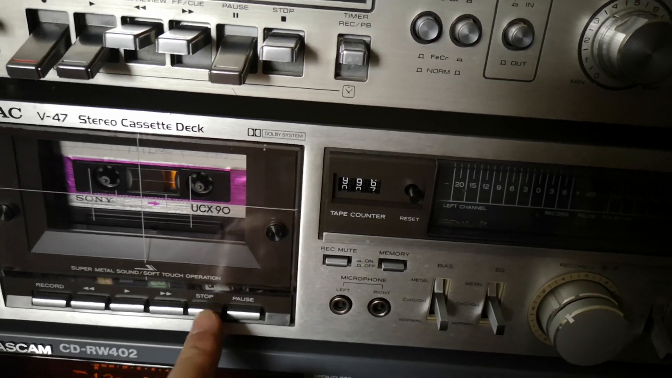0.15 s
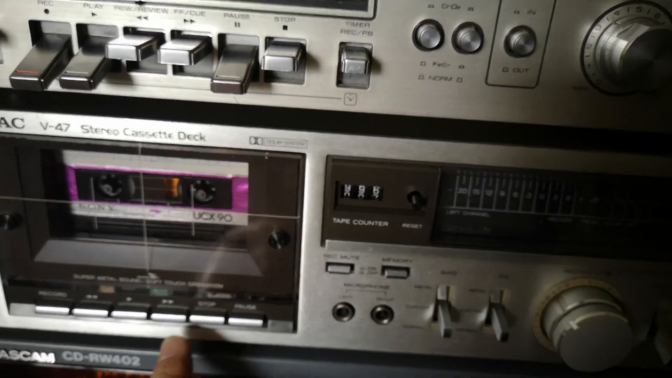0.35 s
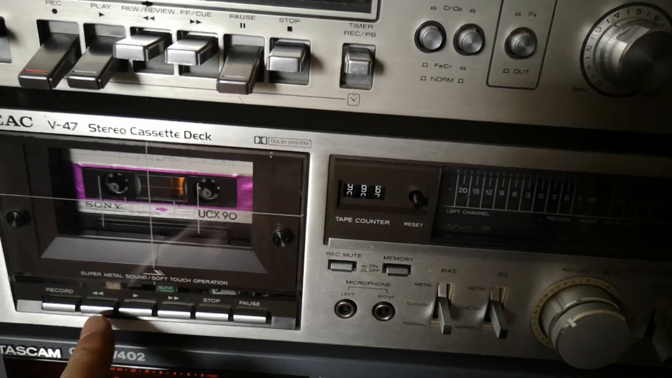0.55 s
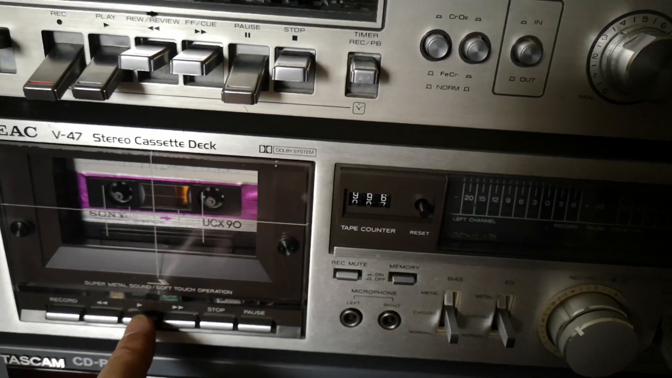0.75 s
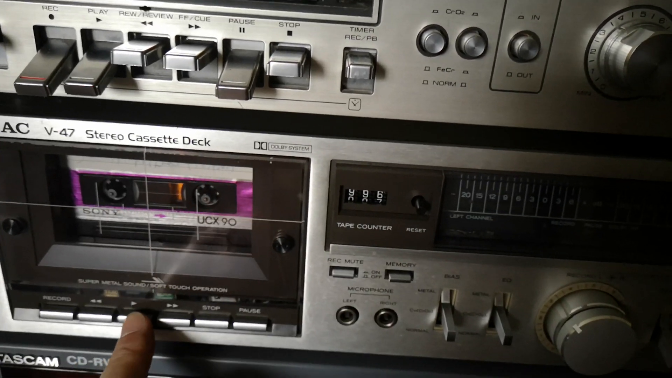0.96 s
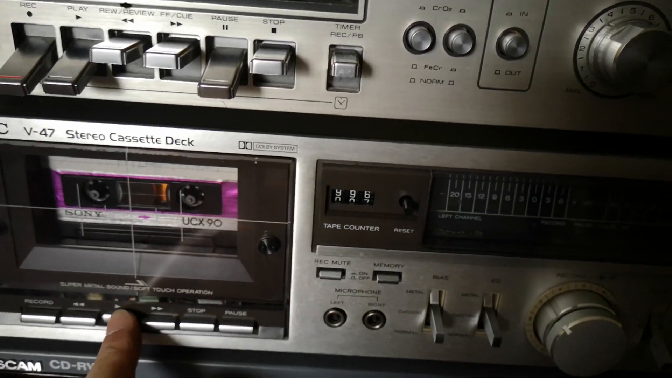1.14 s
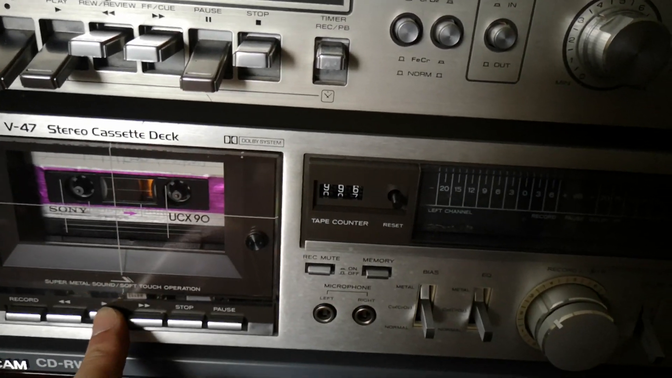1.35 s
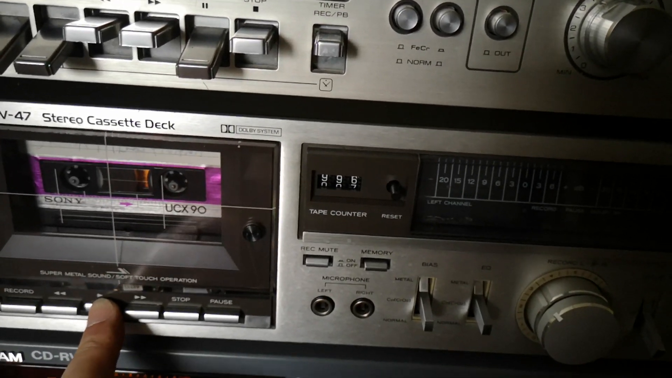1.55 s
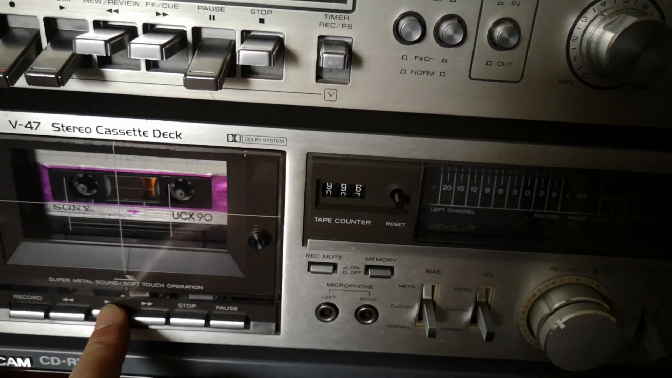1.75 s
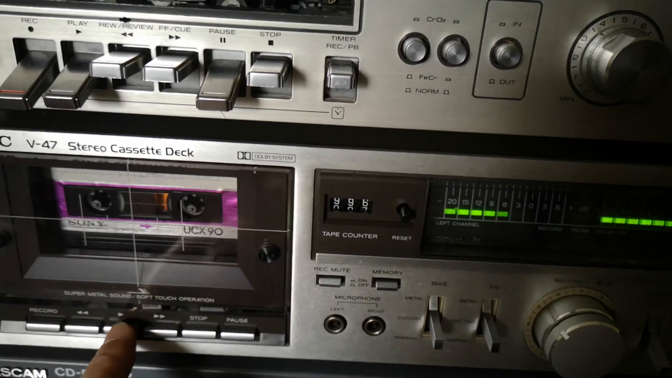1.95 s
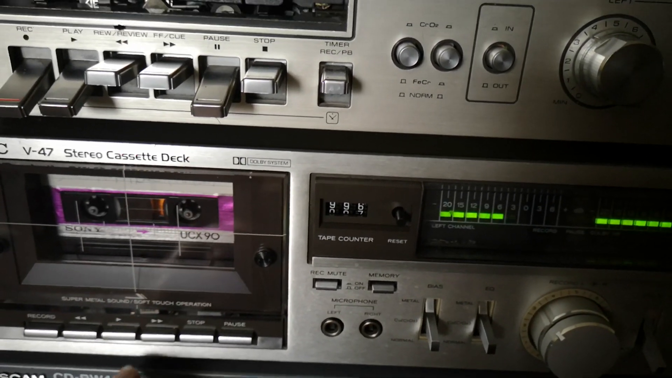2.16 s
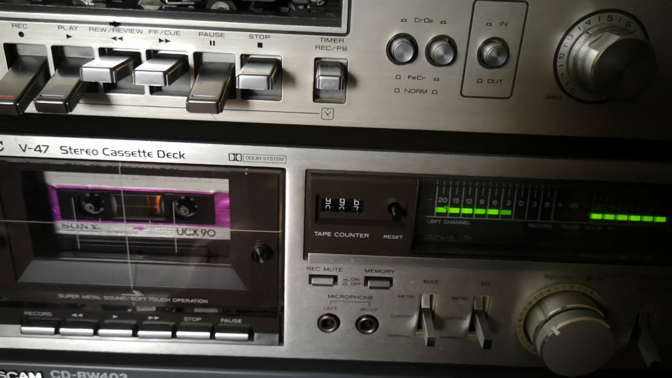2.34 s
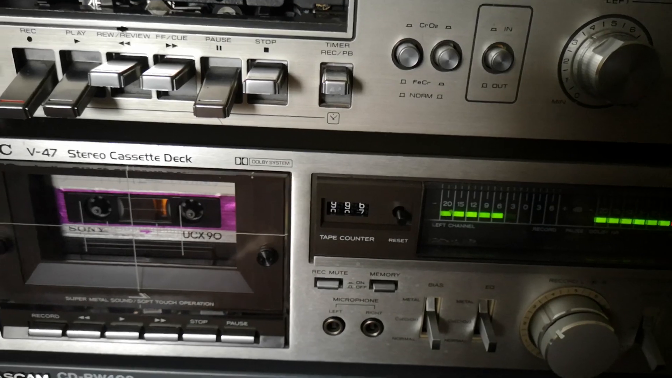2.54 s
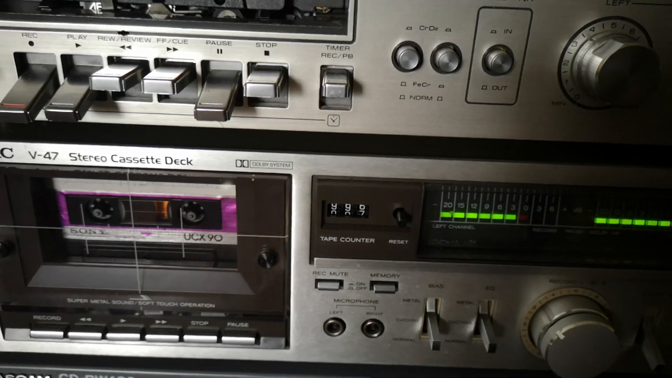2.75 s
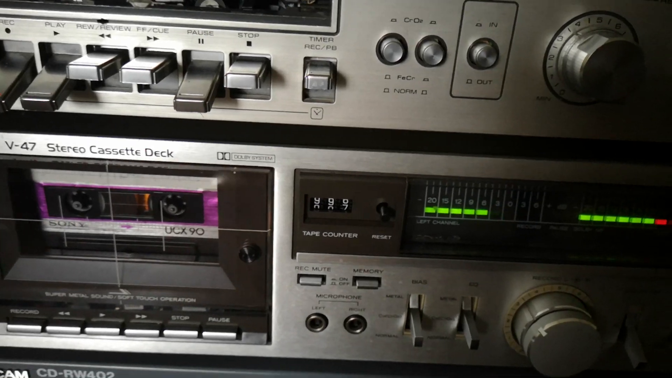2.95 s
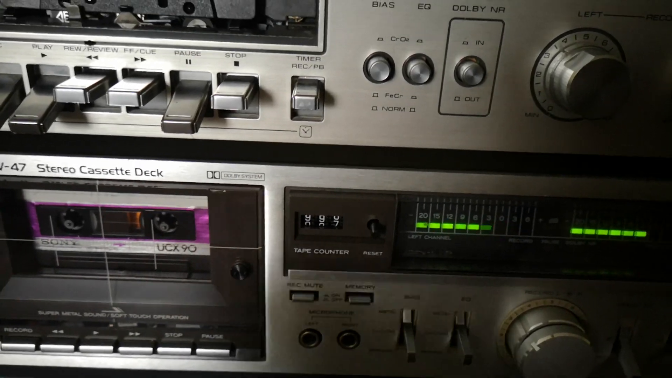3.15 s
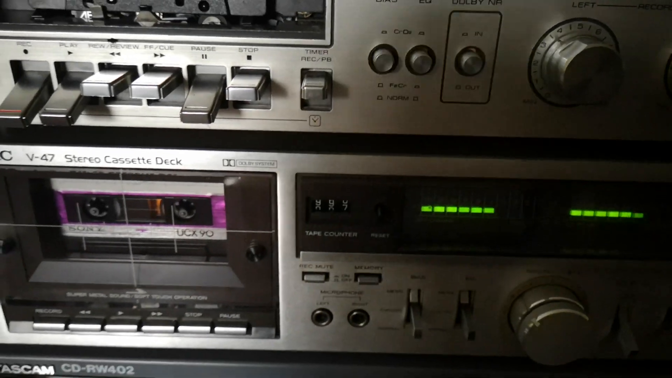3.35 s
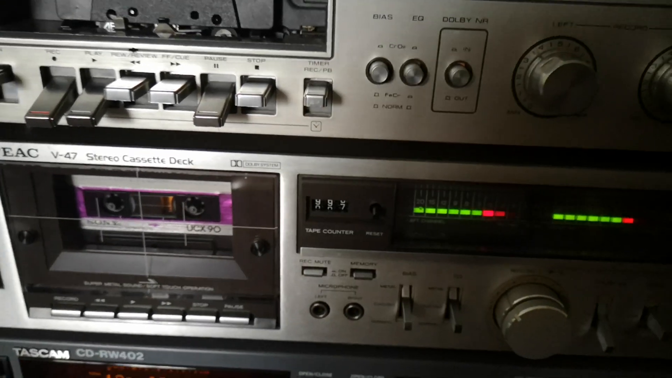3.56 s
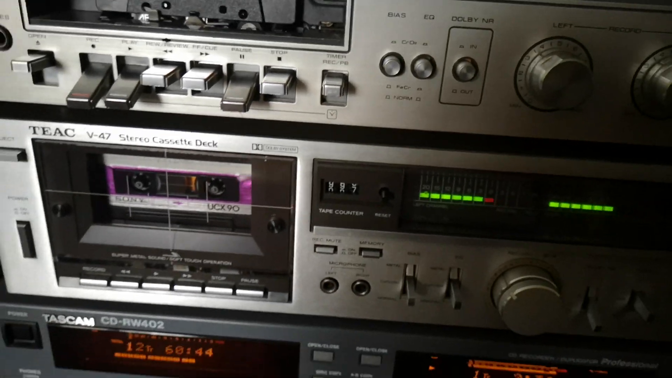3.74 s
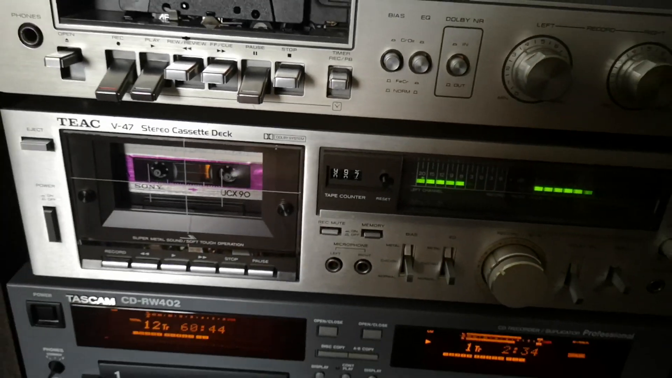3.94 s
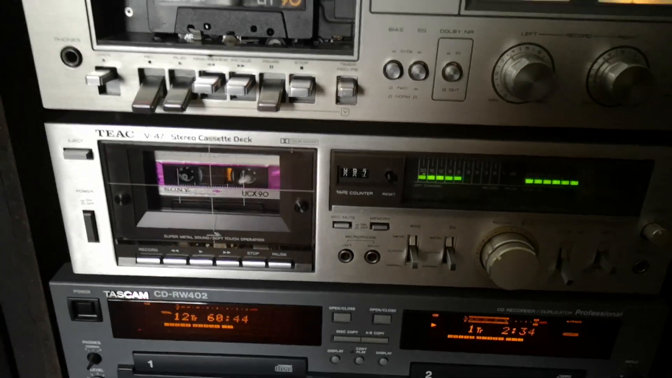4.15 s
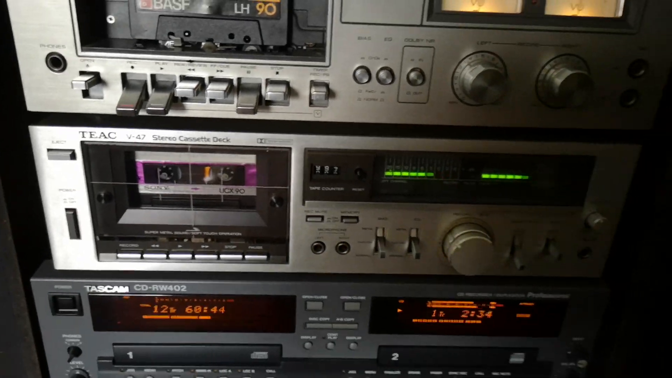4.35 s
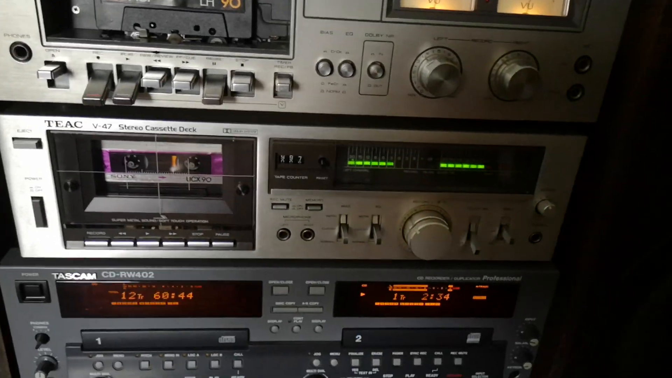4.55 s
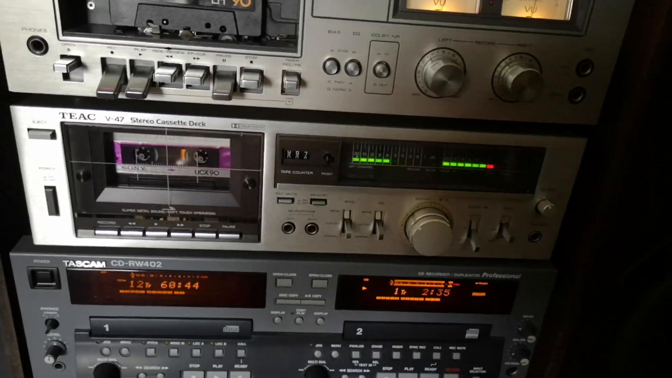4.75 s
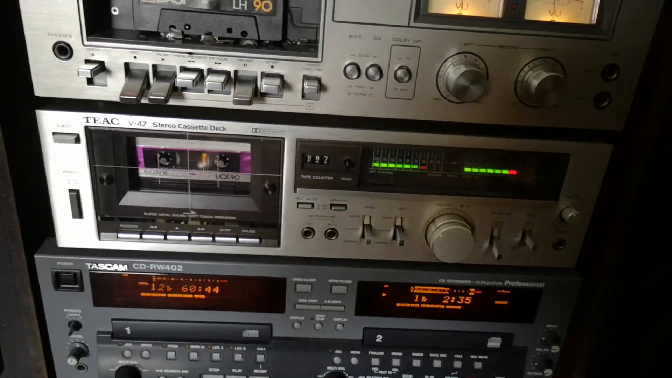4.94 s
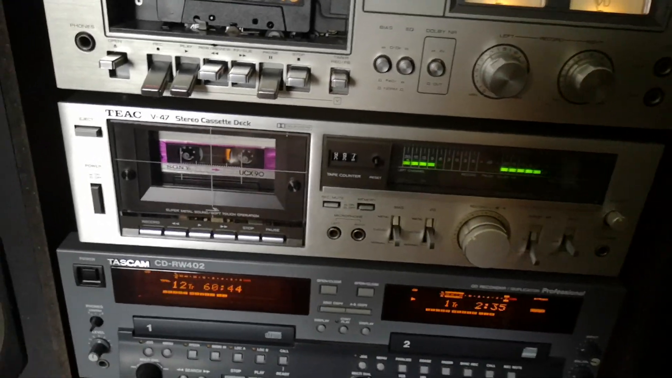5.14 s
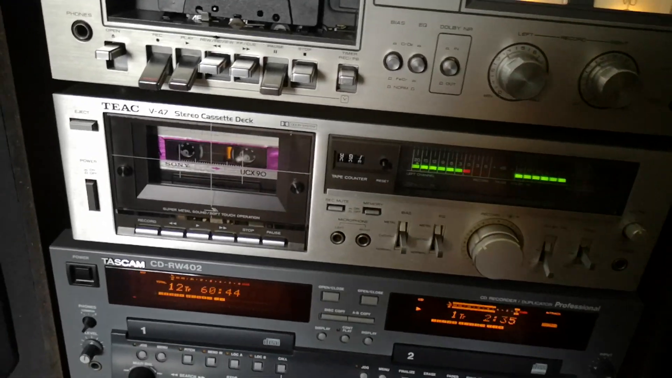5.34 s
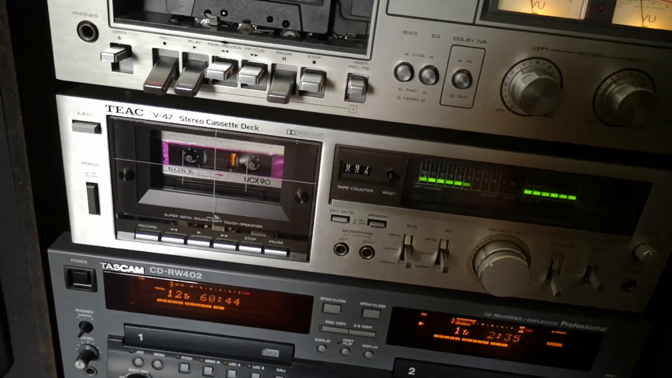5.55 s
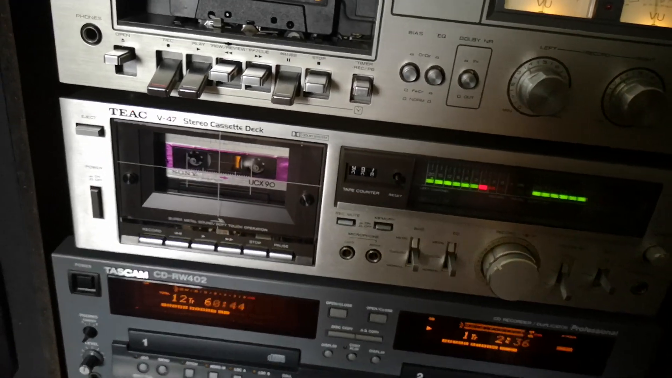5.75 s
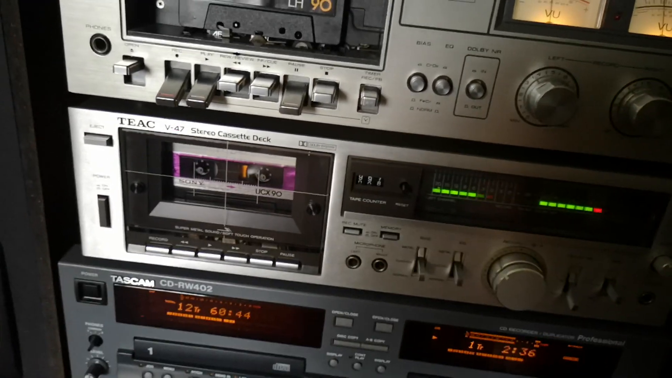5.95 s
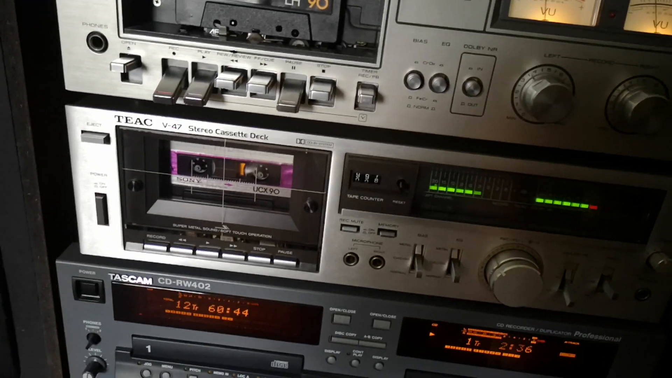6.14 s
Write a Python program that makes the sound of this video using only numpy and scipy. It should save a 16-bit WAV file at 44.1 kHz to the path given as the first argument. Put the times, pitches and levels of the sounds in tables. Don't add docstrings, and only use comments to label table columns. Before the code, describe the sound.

Stereo hand-held microphone close to a tape deck. Chattering latches and levers snap in separate bursts during the first two seconds, loudest at the start and end, with short room echoes and low hollow thuds. Afterwards the deck falls silent except for low hum and thin hiss, broken by dry clicks, tiny crackles and rubbing of the camera body, mostly on the left.

```python
import sys
import numpy as np
from scipy import signal
from scipy.fft import rfft, irfft
from scipy.io import wavfile
from scipy.ndimage import uniform_filter1d

SR = 44100
rng = np.random.default_rng(int(sys.argv[2]) if len(sys.argv) > 2 else 0)


def digitize_waveform(pressure):
    field = np.atleast_2d(pressure).T
    bounded = np.clip(field, -1, 1)
    quanta = np.round(bounded * 32767).astype(np.int16)
    wavfile.write(sys.argv[1], SR, quanta)


def elevation(decibels):
    levels = np.asarray(decibels, float)
    return 10 ** (levels / 20)


N = 273243
T = np.arange(N) / SR
WIDEST_PAN_DB = 24


def evened(x):
    return x / np.sqrt(np.mean(x ** 2) + 1e-20)


def read(points, hz):
    f, value = np.transpose(points)
    return np.interp(np.log(hz + 1), np.log(f + 1), value)


def sides(pan_db):
    return elevation(np.array([[.5], [-.5]]) * pan_db)


def add(mix, s, sound, pan_db):
    part = mix[:, round(s * SR):][:, :sound.shape[-1]]
    part += sides(pan_db) * sound[..., :part.shape[1]]


def band(x, lo_hz, hi_hz):
    return signal.sosfilt(signal.butter(2, [lo_hz, hi_hz], "bandpass", fs=SR, output="sos"), x)


def arch(s, length):
    return np.sin(np.pi * np.clip((T - s) / length, 0, 1))


# pitch_hz, level_db_per_hz
HISS_SPECTRUM = [(20, -30.5), (65, -13.5), (100, -19), (150, -16), (241, -19.5), (319, -25.5), (560, -29.5),
                 (949, -27.5), (1960, -25.5), (2900, -31.5), (4670, -38.5), (6000, -39), (7500, -43),
                 (14300, -46), (16000, -47)]
# pitch_hz, likeness (-1 to 1)
HISS_LIKENESS = [(60, .9), (200, .8), (330, .5), (560, -.5), (800, -.33), (1350, .46), (2600, -.2),
                 (4000, 0)]
# pitch_hz, left_right_db
HISS_LEAN = [(60, 5.5), (180, 0.5), (550, 1.5), (1650, 1.5), (4970, 2), (15000, -2)]
HISS_DB, RIPPLE_DB, PATCH_DB = -72, 1.2, 0.89


def hiss():
    frames, hz = N // 512 + 5, np.fft.rfftfreq(2048, 1 / SR)
    a, b, c, d, patches = rng.standard_normal((frames, 1025, 5)).T
    patches = evened(uniform_filter1d(uniform_filter1d(patches, size=20, axis=0), size=8, axis=1))
    ripple = evened(uniform_filter1d(rng.standard_normal(1025), size=4)) * (hz > 700)
    level_db = (read(HISS_SPECTRUM, hz) + RIPPLE_DB * ripple)[:, None] + PATCH_DB * patches
    likeness = read(HISS_LIKENESS, hz)[:, None]
    lean = elevation(read(HISS_LEAN, hz) / 2)[:, None]
    left = a + 1j * b
    right = likeness * left + np.sqrt(1 - likeness ** 2) * (c + 1j * d)
    z = np.array([left * lean, right / lean]) * elevation(level_db)
    x = signal.istft(z, nperseg=2048, noverlap=1536)[1][:, :N]
    return elevation(HISS_DB) * x / np.std(band(x.mean(0), 170, 22000))


# time_s, level_db
HUM_FADE = [
    (0, -64),
    (4.2, -65.5),
    (6.2, -67),
]
# multiple of the hum pitch, level_db
OVERTONES = [(.5, -14), (1.5, -18.5), (2, -15), (2.5, -34.5)]
# pitch_hz, level_db
MOTOR_WHINE = [(781, -94.5), (937, -88.5), (1289, -89.5), (1464, -95), (1739, -90.5), (2040, -90.5),
               (2374, -100), (2632, -92.5)]
HUM_HZ = 119.97
BEAT_RAD_PER_S, BEAT_TOP_S, BEAT_DB = 1.44, .1, -11.5


def hum():
    turn = 2 * np.pi * HUM_HZ * T
    buzz = np.sin(turn) + elevation(BEAT_DB) * np.sin(turn - BEAT_RAD_PER_S * (T - BEAT_TOP_S))
    for multiple, db in OVERTONES:
        buzz += elevation(db) * np.sin(2 * np.pi * (multiple * HUM_HZ * T + rng.random()))
    whine = sum(elevation(db) * np.sin(2 * np.pi * (hz * T + rng.random())) for hz, db in MOTOR_WHINE)
    fade = elevation(np.interp(T, *np.transpose(HUM_FADE)))
    return np.sqrt(2) * (fade * buzz + whine)


# pitch_hz, t60_s
ROOM_DECAY = [(200, 1), (700, 0.27), (1200, 0.2), (1900, 0.33), (3000, 0.24), (6000, 0.28), (10000, 0.23),
              (14000, 0.37)]
# pitch_hz, level_db
ROOM_TONE = [(700, -1.5), (1200, 2.5), (1900, -1), (3000, 0), (6000, -2), (10000, -2), (14000, -7.5)]
ROOM_HOLD_S, ROOM_CUT_DB_PER_S = 0.098, 200
ROOM_SWAP_S = .03


def room(x):
    taps = np.zeros((3, 2, SR // 2))
    starts = np.arange(130, SR // 2 - 20, 20)
    at = starts + rng.integers(0, 20, (3, 2, len(starts)))
    np.put_along_axis(taps, at, rng.choice([-1., 1.], at.shape), 2)
    hz, t, z = signal.stft(taps, SR, nperseg=256)
    fall_db = -60 * t / read(ROOM_DECAY, hz)[:, None] - ROOM_CUT_DB_PER_S * np.maximum(t - ROOM_HOLD_S, 0)
    gain = elevation(fall_db + read(ROOM_TONE, hz)[:, None])
    tails = signal.istft(z / (abs(z) + 1e-9) * gain, SR, nperseg=256)[1]
    thirds = np.arange(3)[:, None, None] / 3
    turns = np.sqrt(2 / 3) * np.cos(np.pi * (T / ROOM_SWAP_S + thirds))
    return signal.oaconvolve(turns * x, tails / np.linalg.norm(tails[0, 0]), axes=2)[..., :N].sum(0)


# start_s, length_s, peak_db, pitch_hz
JOLTS = [(0.153, 0.11, -63.5, 30), (0.347, 0.21, -60, 30.08), (1.574, 0.32, -56, 48.4),
         (2.094, 0.25, -57, 30.2), (2.306, 0.19, -60.5, 29.86), (3.426, 0.19, -54.5, 26.45),
         (3.635, 0.16, -57, 30.3), (3.759, 0.15, -57, 29.9), (3.854, 0.14, -54.5, 29.5),
         (4.064, 0.15, -62, 30.4), (4.22, 0.13, -58, 29.9), (4.581, 0.064, -57, 50.3),
         (5.489, 0.18, -57.5, 30.1)]
RUMBLE_DB = -73


def hand_jolts():
    lumps = elevation(RUMBLE_DB) * evened(band(band(rng.standard_normal(N), 8.5, 45), 9.2, 40))
    for s, length, db, hz in JOLTS:
        lumps += elevation(db) * arch(s, length) ** 2 * np.sin(2 * np.pi * hz * (T - s))
    return lumps


# start_s, length_s, level_db, pitch_hz
RUSTLES = [
    (0, 0.14, -60.5, 1900),
    (1.297, 0.3, -66, 1780),
    (3.6, 0.974, -71, 1895),
    (6.018, 0.5, -68, 2480),
]


def sliding():
    grain_db = 2.9 * rng.standard_normal(N // 200 + 1).repeat(200)[:N]
    grit = rng.standard_normal((2, N)) * elevation(grain_db)
    out = np.zeros((2, N))
    for s, length, db, hz in RUSTLES:
        swell = np.minimum(3 * arch(s, length), 1)
        out += elevation(db - 6) * swell * evened(band(grit, 0.44 * hz, 1.3 * hz))
    return out


# start_s, length_s, level_db, pitch_hz, bright_part_db
RUBS = [
    (.005, 0.077, -75.5, 750, -6.5),
    (3.691, 0.023, -61, 1674, -9.5),
    (3.71, 0.041, -77, 2000, -16),
    (3.811, 0.061, -68, 1610, -12),
    (4.064, 0.064, -71, 1770, -22),
    (4.171, 0.016, -70.5, 1800, -14),
]
RUB_HIGH_HZ = (4300, 7500)


def rubs():
    out = np.zeros((2, N))
    for s, length, db, hz, high_db in RUBS:
        grit = rng.standard_normal((2, round(length * SR)))
        rub = evened(band(grit, 0.79 * hz, 1.28 * hz)) + elevation(high_db) * evened(band(grit, *RUB_HIGH_HZ))
        add(out, s, elevation(db) * rub * signal.windows.tukey(grit.shape[1], .6), pan_db=14.5)
    return out


# start_s, peak_db, pitch_hz, left_right_db
TICKS = [(0.881, -58.5, 2400, 11), (3.023, -60, 2057, -11), (3.8222, -30.5, 1850, 19),
         (3.844, -64, 2490, 24), (3.915, -62, 1400, 18), (4.026, -59.5, 1410, 21), (4.033, -54, 2490, 16.5),
         (4.041, -55, 2760, 20), (4.0454, -42, 2470, 22.5), (4.0441, -43.5, 875, 10.5),
         (4.0445, -53, 565, 5), (4.612, -55, 331, 0.5), (3.822, -60, 544, 8), (4.502, -52, 550, -3.5),
         (4.6148, -53, 3520, 20), (3.8225, -49, 2920, 20), (4.181, -66, 2000, 8.5), (4.355, -58, 2900, 20),
         (4.372, -50, 1960, 8.5), (4.5016, -45.5, 1240, -8), (4.5024, -46.5, 4000, 25),
         (4.6166, -62, 3200, 9), (4.6147, -47, 2110, 21), (4.851, -53.5, 2300, -14)]
SWAP_PAN_DB, SWAP_HZ = 8.5, 610


def ticks():
    out, t = np.zeros((2, N)), np.arange(SR // 40) / SR
    for s, db, hz, pan_db in TICKS:
        ring = hz * t * elevation(-14 * hz * t) * np.sin(2 * np.pi * hz * t)
        ring = band(ring, 0.54 * hz, 1.36 * hz)
        far = -1 if pan_db > SWAP_PAN_DB or hz < SWAP_HZ else 1
        tick = elevation(db) * ring / abs(ring).max() * np.array([[1], [far]])
        add(out, s, tick, min(pan_db, WIDEST_PAN_DB))
    return out


# start_s, peak_db, pitch_hz, left_right_db
SPARKS = [(3.022, -54, 3000, 4), (3.8224, -44.5, 5400, 24), (3.822, -48.5, 9000, 24),
          (4.026, -56, 9000, 23), (4.026, -60, 3800, 18), (4.033, -54, 9060, 20), (4.041, -46, 9100, 24),
          (4.0455, -41, 8040, 24), (4.0455, -47, 4800, 26), (4.041, -56, 5260, 24), (4.03, -64, 9000, 20),
          (4.139, -59, 7500, 16), (4.149, -60, 7500, 17), (4.151, -62, 7500, 19), (4.166, -62, 7020, 4),
          (4.185, -57, 7500, 15), (4.187, -61, 6980, 10), (4.195, -61, 7500, 4), (4.3085, -48.5, 7600, -5),
          (4.309, -50.5, 13000, -21), (4.354, -60, 10000, 12), (4.356, -59, 7450, 18), (4.36, -64, 9400, 4),
          (4.3595, -57, 14000, 0), (4.371, -49.5, 5040, 12.5), (4.371, -53.5, 10000, 15),
          (4.375, -58, 9500, 10), (4.378, -57, 9600, 10), (4.382, -63, 5450, 10), (4.388, -65, 9500, 8),
          (4.388, -62, 5500, 8), (4.5035, -41, 2700, -10), (4.5026, -55, 11100, -14), (4.591, -59, 6600, 5),
          (4.615, -40, 4640, 24), (4.6148, -42, 9400, 25), (4.617, -57, 13020, 0), (4.8513, -61, 3770, -17)]


def sparks():
    out, t = np.zeros((2, N)), np.arange(SR // 40) / SR
    for s, db, hz, pan_db in SPARKS:
        click = (t == 0) + 0.32 * rng.standard_normal((2, len(t)))
        spark = band(click * elevation(-60 * t / 0.00059), 0.61 * hz, min(1.56 * hz, 16000))
        spark = band(spark, 0.56 * hz, min(0.95 * hz, 16100))
        add(out, s, elevation(db) * spark / abs(spark).max(), min(pan_db, WIDEST_PAN_DB))
    return out


# start_s, level_db, hold_s
GRUMBLES = [
    (0, -62, 0.039),
    (0.174, -43.5, 0.061),
    (0.342, -51.5, 0.12),
    (1.18, -57, 0.079),
    (1.292, -63.5, 0.25),
    (1.547, -54.5, 0.0091),
    (1.624, -49, 0.072),
    (2.056, -52, 0.073),
]
GRUMBLE_RISE_S, GRUMBLE_T60_S = 0.011, 0.15


def grumble():
    pressed = np.zeros(N)
    for s, db, hold in GRUMBLES:
        fall_db = -60 * np.maximum(T - s - hold, 0) / GRUMBLE_T60_S
        pressed += np.clip((T - s) / GRUMBLE_RISE_S, 0, 1) * elevation(db + fall_db)
    grind = rng.standard_normal(N) + 0.21 * rng.standard_normal((2, N))
    return evened(band(band(grind, 73, 230), 120, 520)) * pressed


# start_s, level_db, pitch_hz, t60_s
BOOMS = [(0.188, -47.5, 188.7, 0.2), (0.203, -49.5, 116, 0.46), (.214, -39, 72.4, 0.15),
         (.24, -44, 189.4, 0.26), (.274, -35, 106.4, 0.099), (0.3786, -34, 187.6, 0.33),
         (0.383, -47.5, 51.58, 0.19), (0.391, -49, 98, .3), (0.39, -51.5, 250.7, 0.22),
         (1.191, -52, 67.2, 0.15), (1.199, -55, 187, 0.12), (1.255, -37, 184, 0.069), (1.4, -60, 185, 0.4),
         (1.561, -46.5, 185.4, 0.2), (1.64, -36, 62.7, 0.14), (1.648, -38, 187.8, 0.21),
         (1.65, -63.5, 118, 0.27), (2.062, -35.5, 184.2, 0.29), (2.071, -50.5, 99, 0.19),
         (2.101, -60.5, 122.6, 1), (3.365, -49, 163.5, 0.079), (4.177, -39.5, 250, 0.032),
         (4.61, -33, 64.3, 0.043)]
BOOM_RISE_S, BOOM_LEAD_RAD = 0.015, .28


def booms():
    out, t = np.zeros((2, N)), np.arange(SR // 2) / SR
    lead = np.array([[BOOM_LEAD_RAD], [0]])
    for s, db, hz, t60 in BOOMS:
        swell = (1 - np.exp(-t / BOOM_RISE_S)) ** 2 * elevation(db + 9.5 - 60 * t / t60)
        add(out, s, swell * np.sin(2 * np.pi * hz * t + lead), 0)
    return out


# start_s, level_db
BLOWS = [
    (0.188, -53),
    (.272, -68),
    (.358, -59),
    (0.379, -46.5),
    (1.18, -71),
    (1.548, -83),
    (1.627, -57.5),
    (2.056, -46.5),
]
# pitch_hz, level_db, t60_s
PLATES = [(355.5, -5.5, 0.4), (484, 9, 0.17), (529.7, 4.5, 0.37), (530, 9, 0.09), (650, 0.5, .12)]
# pitch_hz, level_db, t60_s
SPRINGS = [(906, -10.5, .45), (1566, -13, 0.55), (1532, -15, .4), (1641.6, -15, .3), (1759, -13.5, .25),
           (1985, -15, 0.52), (1960, -12, 0.83), (2150, -12, .25)]
CHASSIS_RISE_S = 0.0071
ROCKING_HZ, ROCKING_TURN = (430, 610), .45


def chassis():
    out, t = np.zeros((2, N)), np.arange(SR // 2) / SR
    hz, db, t60 = np.transpose(PLATES + SPRINGS)[:, :, None]
    fade = elevation(db - 60 * t / np.clip(t60, .05, .8))
    for s, blow_db in BLOWS:
        phase = rng.random(hz.shape) + hz / 9000 * rng.standard_normal((2, len(hz), 1))
        phase[1] += ROCKING_TURN * (hz > ROCKING_HZ[0]) * (hz < ROCKING_HZ[1])
        ring = (fade * np.sin(2 * np.pi * (hz * t + phase))).sum(1)
        add(out, s, elevation(blow_db) * (1 - np.exp(-t / CHASSIS_RISE_S)) * ring, 0)
    return out


# pitch_hz, level_db, t60_s
PANEL = [(466, -4, .15), (696, 0.5, 0.13), (772, 3, 0.11), (920, -5.5, 0.034), (967, -0.5, 0.13),
         (1225.6, -6.5, 0.13), (1378, -1, 0.074), (1560, -14.5, 0.15), (1620, -5, 0.013), (1800, -3, 0.057),
         (2030, -6, 0.05), (2160, -5.5, 0.074), (2400, -7.5, 0.03), (2700, -30, .03)]
# pitch_hz, level_db, t60_s
RATTLE = [(874, -9, 0.077), (1910, -9, 0.083)]
DETUNE = .004
SIDEWAYS_HZ, SIDEWAYS_TURN = 600, .38
KNOCK_LAG_S = .00008


def panel_ring(top_hz, t):
    hz, db, t60 = np.transpose(PANEL)[:, :, None]
    near_db = -12.5 * abs(np.log2(hz / top_hz))
    apart_turn = (0.021 + (hz / 5200) ** 2) * rng.standard_normal((2, len(hz), 1))
    phase = rng.random(hz.shape) + apart_turn
    phase[1] += SIDEWAYS_TURN * (hz < SIDEWAYS_HZ)
    tuned = hz * (1 + DETUNE * rng.standard_normal(hz.shape))
    modes = elevation(db + near_db - 60 * t / t60) * np.sin(2 * np.pi * (tuned * t + phase))
    ring = modes.sum(1)
    both, apart = rng.standard_normal(len(t)), rng.standard_normal((2, len(t)))
    for mid_hz, loose_db, loose_t60 in RATTLE:
        loose = band(both + mid_hz / 2500 * apart, 1.1 * mid_hz, 1.22 * mid_hz)
        loose = band(loose, 0.64 * mid_hz, 1.25 * mid_hz)
        far_db = -9.5 * abs(np.log2(mid_hz / top_hz))
        ring = ring + elevation(loose_db + far_db - 60 * t / loose_t60) * evened(loose)
    late = t - np.array([[0], [KNOCK_LAG_S]])
    knock = 6.8 * elevation(-60 * t / 0.0081) * np.sin(2 * np.pi * (top_hz * late + phase[0, -1]))
    return ring + knock


# start_s, panel_peak_db, snap_db, strongest_panel_hz, chatter_t60_s
LATCHES = [(0.1834, -11, -19.5, 2430, 0.027), (.188, -9.5, -24, 1890, 0.019),
           (0.2, -23, -35.5, 1740, 0.022), (0.2708, -26, -42, 2250, 0.025), (.355, -16, -23, 1987, 0.031),
           (.376, -8.5, -34.5, 1880, 0.026), (.381, -24.5, -48, 1855, 0.024),
           (1.1617, -33.5, -37, 4200, 0.03), (1.182, -31, -38, 1480, 0.037),
           (1.344, -51, -58.5, 1830, 0.03), (1.546, -33, -40, 2370, 0.06),
           (1.628, -23.5, -30.5, 1350, 0.037), (1.634, -24, -35.5, 1626, 0.031),
           (1.943, -52, -70, 2650, 0.034), (2.025, -54, -67, 1340, 0.044), (2.042, -19.5, -37, 1200, 0.086),
           (2.0501, -25.5, -25.5, 1614, 0.056), (2.0538, -12.5, -28.5, 1960, 0.02),
           (2.0542, -11.5, -32, 865, 0.022), (2.06, -25, -58, 1200, 0.046)]
# start_s, panel_peak_db, snap_db, strongest_panel_hz, chatter_t60_s
LEVERS = [(0.167, -35.5, -66.5, 1880, 0.046), (0.1784, -28, -28.5, 1530, 0.03),
          (0.22, -45.5, -46.5, 1300, 0.022), (.238, -27.5, -53, 2280, 0.11),
          (0.245, -34, -40.5, 2000, 0.03), (.36, -15, -30, 1933, 0.09), (.372, -18.5, -26, 1300, .042),
          (0.3764, -12.5, -61, 850, .022), (1.152, -47.5, -63, 1770, 0.034), (1.165, -34.5, -50, 853, 0.07),
          (1.19, -39, -44.5, 1400, 0.033), (1.3, -54, -84, 950, .06), (1.334, -54, -84, 930, 0.064),
          (1.409, -54, -75, 1410, 0.06), (1.435, -48, -69, 1900, 0.058), (1.52, -35, -65, 1830, 0.032),
          (1.548, -34.5, -49, 770, 0.023), (1.558, -31, -63, 1460, 0.0089),
          (1.624, -20.5, -46, 1800, 0.035), (1.646, -41.5, -54, 920, 0.076),
          (2.035, -42.5, -51, 1410, 0.022), (0.183, -20, -67.5, 2980, 0.066), (0.184, -12, -71, 4600, .03),
          (0.199, -29.5, -69, 1230, 0.031), (2.053, -27, -43, 1900, .03), (.356, -24, -68, 770, .06),
          (0.211, -30, -40.5, 1400, .02), (.32, -52.5, -61, 2200, .015), (1.638, -43, -59, 1000, .05),
          (1.648, -33, -55, 1400, .03), (1.198, -39, -61, 1300, .03), (2.068, -26.5, -58, 2058, .09),
          (.392, -30, -55, 2130, .09), (1.161, -42, -37.5, 1296, .03), (0.193, -19.5, -40, 1442, 0.041),
          (1.55, -36, -63, 781, .04), (.366, -17, -47, 901.3, .06), (.368, -15, -52, 1905, .06),
          (1.166, -35.5, -62, 896, 0.062), (1.63, -29.5, -58, 1148, 0.056)]
# pitch_hz, level_db_per_hz
SNAP_COLOUR = [(1470, -20.5), (2500, -3.5), (2880, -7.5), (4620, -1.5), (6110, -5.5), (7530, -6),
               (11000, -10.5), (14700, -16), (15400, -21.5), (16000, -46)]
# pitch_hz, left_right_db
DECK_LEAN = [(600, -1), (950, -4), (1250, 0), (1900, -5), (2500, 7), (4600, -1), (8000, 2), (12000, -9)]
LATCH_RISE_S, LEVER_RISE_S = 0.00023, 0.005


def strikes():
    out, t = np.zeros((2, N)), np.arange(SR // 4) / SR
    bins = np.fft.rfftfreq(len(t), 1 / SR)
    lean = sides(read(DECK_LEAN, bins))
    colour = elevation(read(SNAP_COLOUR, bins))
    colour = colour / np.sqrt(np.mean(colour ** 2))
    ending = np.clip(20 * (t[-1] - t), 0, 1) ** 2
    rows = [(*row, LATCH_RISE_S) for row in LATCHES] + [(*row, LEVER_RISE_S) for row in LEVERS]
    for s, panel_db, snap_db, top_hz, chatter, rise in rows:
        fade = elevation(-60 * t / chatter) * (1 - np.exp(-t / rise))
        fade = fade / fade.max()
        shake, left, right = rng.standard_normal((3, len(t))) * fade
        push = abs(shake) - 0.49 * fade
        panel = signal.fftconvolve(push[None], panel_ring(top_hz, t), axes=1)[:, :len(t)]
        panel = band(band(panel, 610, 2700), 640, 5500)
        panel = elevation(panel_db - 6.5) * panel / abs(panel).max()
        snap = elevation(snap_db - 1.5) * rfft([left, right]) * colour
        add(out, s, irfft((rfft(panel) + snap) * lean, len(t)) * ending, 0)
    return out


def scene():
    background = hiss() + hum()
    camera = hand_jolts() + sliding() + rubs() + ticks() + sparks()
    deck = strikes()
    echoes = room(elevation(-13) * deck)
    return background + echoes + camera + grumble() + booms() + chassis() + deck


def top_cut(x):
    return signal.sosfilt(signal.butter(12, 16320, fs=SR, output="sos"), x)


def record(dry):
    lowpass = signal.firwin(255, 15700, window=("kaiser", 8), fs=SR)
    limited = signal.oaconvolve(dry, lowpass[None], "same")
    return top_cut(limited - .0003)


dry = scene()
out = record(dry)
digitize_waveform(out)
```